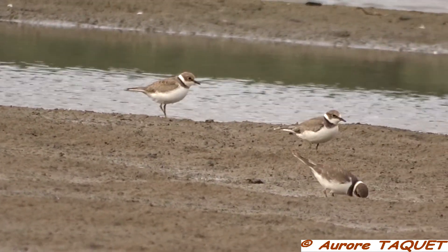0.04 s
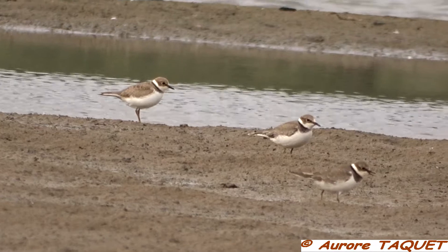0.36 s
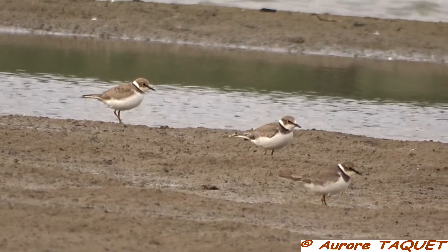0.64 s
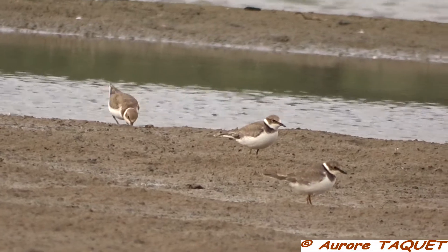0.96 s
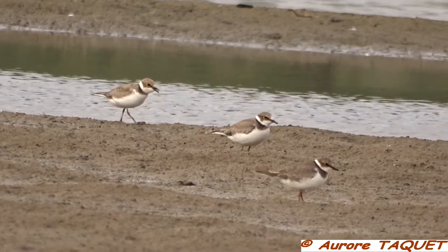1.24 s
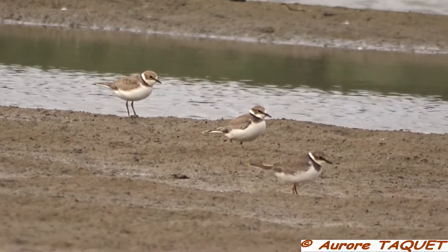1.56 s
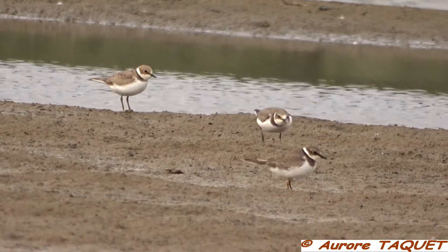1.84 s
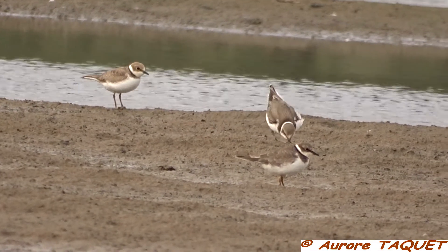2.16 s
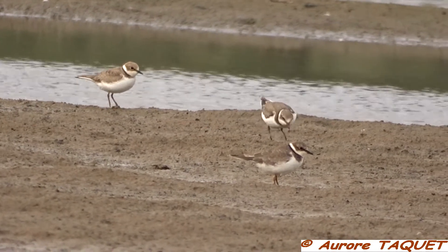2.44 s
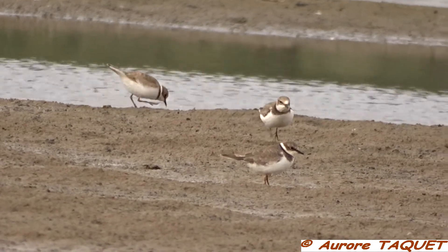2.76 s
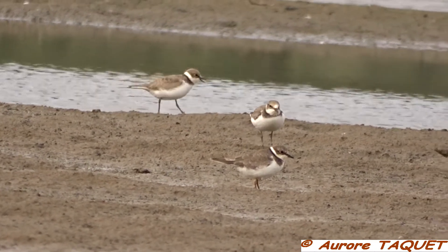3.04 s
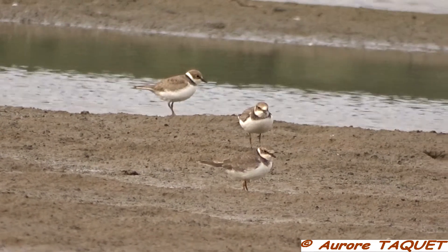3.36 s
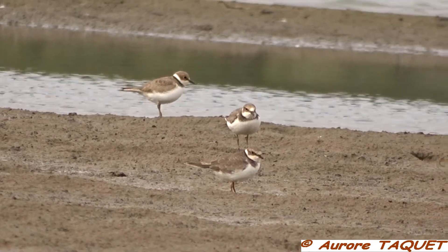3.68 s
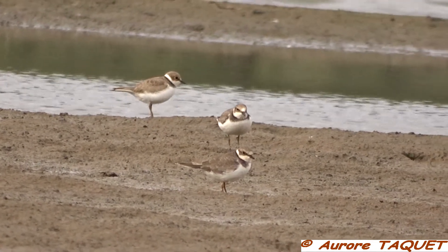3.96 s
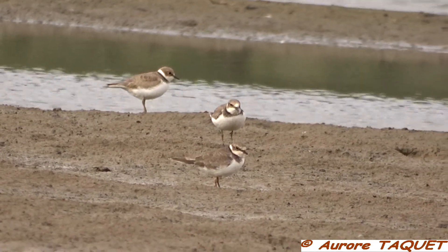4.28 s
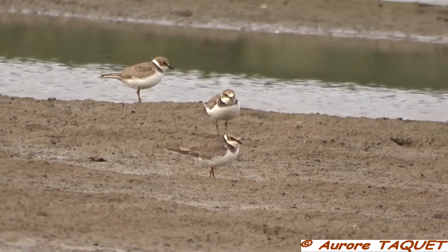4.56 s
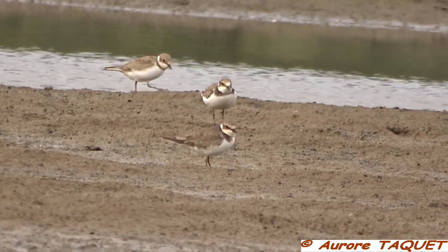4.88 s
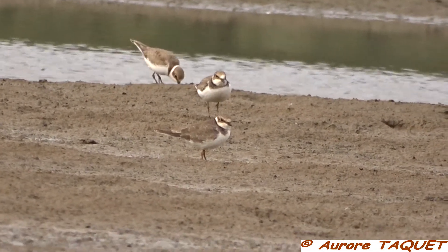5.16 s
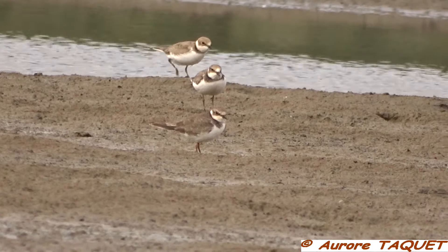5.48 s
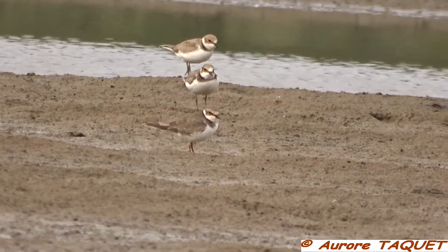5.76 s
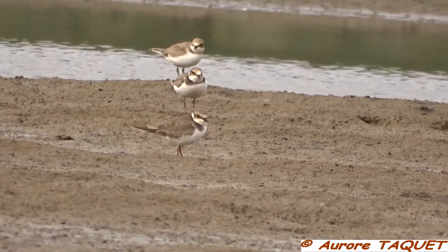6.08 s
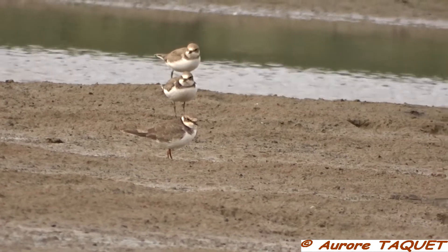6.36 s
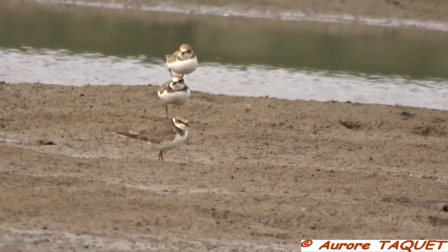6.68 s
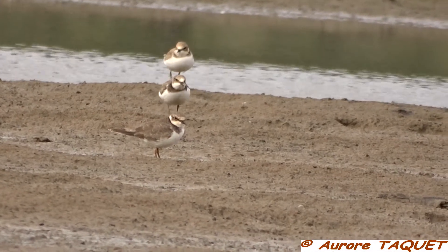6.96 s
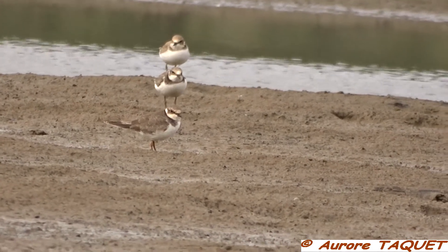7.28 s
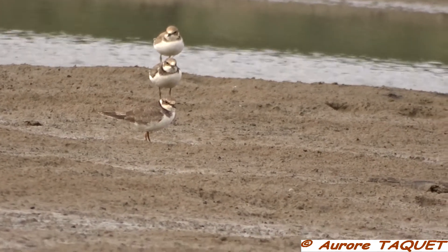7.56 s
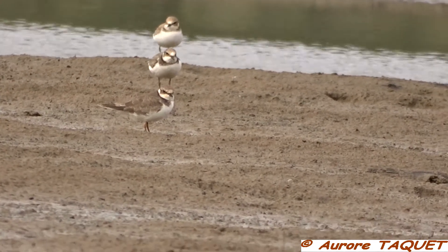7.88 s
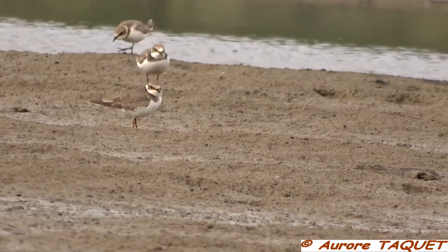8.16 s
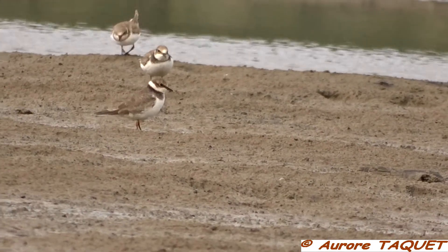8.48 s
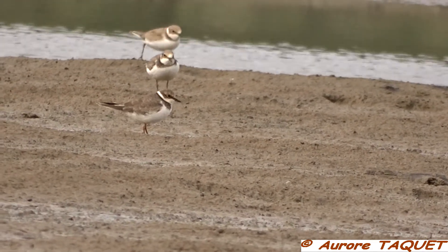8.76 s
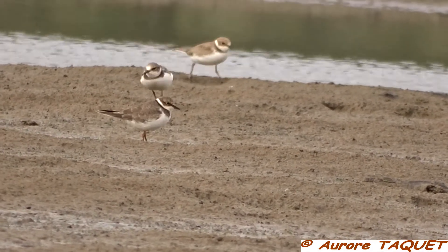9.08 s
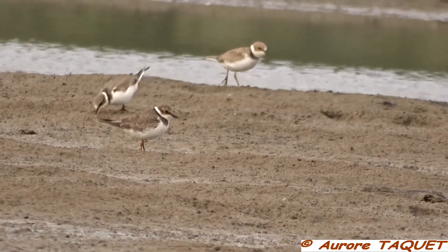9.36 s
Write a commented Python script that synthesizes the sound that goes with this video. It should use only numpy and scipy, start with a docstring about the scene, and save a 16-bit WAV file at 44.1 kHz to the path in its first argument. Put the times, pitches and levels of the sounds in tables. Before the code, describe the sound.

Two brief, high plover calls and faint distant peeps sound as gusts rumble on the microphone and fade to a soft hiss.

```python
"""Gusts buffet a camera microphone on an open sandbank, over a far murmur and a thin hiss.
Near 2 s a small plover gives a short, high call, sung with both sides of its syrinx at once;
the banks scatter it into a short tail. The wind peaks around 3.6 s and dies away after 5 s,
leaving the murmur, the hiss and other birds peeping faintly far off.
The plover calls again near 6.4 s, and the far peeps carry on to the end."""
import sys
import numpy as np
from scipy import signal
from scipy.fft import rfft, irfft, next_fast_len
from scipy.io import wavfile
from scipy.ndimage import map_coordinates

SR = 44100
rng = np.random.default_rng(int(sys.argv[2]) if len(sys.argv) > 2 else 0)


def store_wav(level_fs):
    """Save 16-bit WAV to argv[1]."""
    pcm = np.round(np.clip(np.atleast_2d(level_fs), -1, 1) * 32767)
    wavfile.write(sys.argv[1], SR, pcm.T.astype(np.int16))


N = 420273


def amp(db):
    """Decibels to gain."""
    return 10 ** (np.asarray(db) / 20)


def along(points, hz):
    """Read (Hz, value) points on a log frequency axis."""
    freqs, values = np.transpose(points)
    return np.interp(np.log(hz + 1), np.log(freqs + 1), values)


def curves(rows):
    """Automation lanes: one value per sample for each column after the time."""
    times, *lanes = np.transpose(rows)
    return [np.interp(np.arange(N) / SR, times, lane) for lane in lanes]


def wobble(rate):
    """A smooth random curve, rate knots a second."""
    return map_coordinates(rng.standard_normal(int(N * rate / SR) + 4), [np.arange(N) * rate / SR])


def filtered(x, response):
    """EQ x with a gain given as a function of frequency."""
    size = next_fast_len(N + SR // 2)
    return irfft(rfft(x, size) * response(np.fft.rfftfreq(size, 1 / SR)), size)[..., :N]


def panned(x, left_db):
    """Tilt the balance left_db toward the left."""
    return x * amp([[left_db / 2], [-left_db / 2]])


def rush(spectrum, correlation, lumps_db=0):
    """Stereo noise of rms 1; lumps_db breaks it into bursts before it is coloured."""
    def mid_side_eq(hz):
        width = np.arccos(np.clip(along(correlation, hz), -1, 1)) / 2
        return amp(along(spectrum, hz)) * [np.cos(width), np.sin(width)]
    mid, side = filtered(rng.standard_normal((2, N)) * amp(lumps_db), mid_side_eq)
    stereo = np.array([mid + side, mid - side])
    return stereo / np.sqrt(np.mean(stereo ** 2) + 1e-20)


def scattered(x, t60_s, build_s):
    """The diffuse tail off banks and water, different at each ear."""
    t = np.arange(SR // 2) / SR
    build_up = 1 - np.exp(-(t / build_s) ** 4)
    tail = rng.standard_normal((2, len(t))) * amp(-60 * t / t60_s) * build_up
    return signal.fftconvolve(x[None], tail / np.linalg.norm(tail[0]), axes=1)[:, :N]


def air():
    """The bed: a far murmur of open country and a thin hiss, both easing as the breeze drops."""
    # fader rides, ahead of the trim: time_s, hiss_db, murmur_db
    rides = [(0.0, -55, -59.5), (5.9, -56, -58), (6.9, -57.7, -58.5), (7.5, -58.3, -63),
             (8.15, -58.6, -60.5), (8.5, -59, -63.5), (9.53, -59, -62.5)]
    # tone of each layer: freq_hz, level_db
    murmur_eq = [(20, -4), (45, 4), (80, -11), (125, -4.5), (165, 3.5), (230, -3.5), (390, -15),
                 (480, -7.5), (590, -11), (680, -3.5), (770, -13), (1400, -15.5), (3000, -38), (6000, -66)]
    hiss_eq = [(500, 3.5), (1600, -5.5), (2300, -1), (3000, 1.56), (3600, 1.2), (5800, -0.06), (6400, -2),
               (7100, 2), (7700, 1.5), (8050, 0), (8600, 1), (9400, -2), (10200, -2.5), (11000, -9.5)]
    # left-right likeness: freq_hz, correlation
    image = [(100, 1), (270, 1), (520, .15), (700, 0.34), (1200, 0.17), (2500, 0.59), (5200, 0.82),
             (7600, 0.89), (10000, 0.4)]
    hiss_db, murmur_db = curves(rides)
    murmur = amp(murmur_db + 1.3 * wobble(4)) * rush(murmur_eq, image)
    hiss = amp(hiss_db + 1.46) * rush(hiss_eq, image)
    return panned(murmur, left_db=3.0) + panned(hiss, left_db=-2)


def far_birds(fall_share=0.026):
    """Faint falling peeps, some pure, some raspy, washed in scattered sound."""
    # distant peeps: start_s, length_s, pitch_hz, level_db, rasp_share (of the pitch)
    notes = [(.96, 0.11, 7650, -59, 0.036), (5.50, 0.097, 7100, -59, 0.027), (5.58, 0.092, 7740, -59, .035),
             (5.73, 0.102, 7100, -58, .035), (5.786, .08, 3010, -61.5, .003),
             (6.13, 0.079, 6930, -58, .005), (6.20, 0.065, 6330, -61, .006),
             (6.336, 0.197, 3540, -62, .016), (6.61, .09, 3200, -66, .007), (7.502, 0.096, 5200, -63, .03),
             (9.02, 0.04, 5520, -59.5, .06), (9.13, 0.043, 5800, -55.5, .07), (9.19, 0.036, 5120, -59, .06),
             (9.322, 0.058, 7700, -58, 0.057)]
    t, peeps = np.arange(N) / SR, np.zeros(N)
    jitter = wobble(1200)
    for start, length, hz, db, rasp in notes:
        on = (t > start) & (t < start + length)
        progress = (t[on] - start) / length
        pitch = hz * (1 - fall_share * (progress - .5) + rasp * jitter[on])
        peeps[on] += amp(db) * np.sin(np.pi * progress) * np.sin(2 * np.pi * np.cumsum(pitch) / SR)
    tail = scattered(peeps, t60_s=0.31, build_s=0.01)
    return panned(peeps + amp(-2.5) * tail, left_db=-1.0)


def airflow(attack_s=.016, release_s=0.03, surge_s=0.056, lull_db=-10):
    """Swell, buffet and flutter rides in dB: gusts and surges add to the breeze, lulls cut into it."""
    # the breeze between gusts: time_s, swell_db, buffet_db
    breeze = [(0.0, -40, -42.5), (0.7, -41.5, -40.5), (1.13, -46, -44.5), (1.3, -42, -45.5),
              (1.75, -43, -42.5), (2.65, -43.5, -42), (3.45, -43, -36.5), (3.9, -47, -46.5),
              (4.6, -46, -43), (4.95, -47, -45.5), (5.4, -51, -49), (5.95, -48, -61.5), (6.3, -57.5, -61),
              (7.2, -61, -66), (7.9, -57.5, -71), (8.35, -83, -78), (8.6, -60.5, -75), (9.53, -62.5, -73)]
    # gusts riding on it: start_s, length_s, buffet_db, flutter_db
    gusts = [(0.137, 0.03, -38, -48.5), (0.236, 0.057, -39.5, -41), (0.435, 0.027, -37.5, -41.5),
             (0.521, 0.076, -38.5, -43.5), (1.497, .07, -37.5, -42), (1.652, 0.14, -42.5, -49.5),
             (2.117, 0.084, -33.5, -39.5), (2.246, 0.03, -36.5, -43), (2.319, .1, -37, -46),
             (2.696, 0.013, -39, -43.5), (2.784, 0.082, -35.5, -38), (2.886, .06, -30.5, -34),
             (3.045, 0.059, -39, -40.5), (3.17, 0.12, -34.5, -40), (3.405, 0.24, -38.5, -40.5),
             (3.603, 0.085, -37.5, -33), (3.739, .16, -38.5, -40.5), (4.177, 0.14, -38, -43),
             (4.445, 0.047, -40, -44.5), (4.845, 0.033, -43, -62), (4.979, 0.19, -40, -47.5),
             (5.934, 0.043, -45.5, -64), (7.807, .07, -54, -70)]
    # big slow eddies pressing on both microphone ports: middle_s, level_db
    surges = [(.15, -38), (.82, -40), (1.28, -39), (1.94, -34), (2.335, -33.5), (3.02, -37.5), (3.42, -38),
              (4.11, -35), (4.43, -37.5), (4.935, -37), (5.68, -51)]
    # the air stands almost still: middle_s, length_s
    lulls = [(1.985, 0.035), (4.05, 0.037), (4.378, 0.087), (5.563, 0.092), (5.795, 0.094), (6.215, 0.09)]
    t = np.arange(N) / SR
    bump = lambda middle, length: np.exp(-(2 * (t - middle) / length) ** 2)
    swell_db, breeze_db = curves(breeze)
    buffet = amp(breeze_db)
    fresh_breeze_db, fresh_flutter_db = -42, -54
    flutter = amp(fresh_flutter_db + 1.55 * (breeze_db - fresh_breeze_db))  # grows faster than buffet
    for start, length, buffet_db, flutter_db in gusts:
        end = start + length
        gust = np.interp(t, [start - attack_s, start, end, end + release_s], [0, 1, 1, 0])
        buffet = np.hypot(buffet, amp(buffet_db) * gust)
        flutter = np.hypot(flutter, amp(flutter_db) * gust)
    swell = np.hypot(amp(swell_db), sum(amp(db) * bump(middle, surge_s) for middle, db in surges))
    dips_db = lull_db * sum(bump(middle, length) for middle, length in lulls)
    return 20 * np.log10([swell, buffet, flutter]) + dips_db


def wind():
    """Large eddies swell at both ports alike; faster air sheds small, bright ones."""
    # tone of each layer, darkest first: freq_hz, level_db
    swell_eq = [(10, -8.5), (25, -8.5), (50, -2.5), (80, -4.5), (130, -15), (250, -32), (600, -93)]
    buffet_eq = [(30, -46), (70, -5), (110, 0), (160, 0), (240, -5), (400, -15), (700, -34.5), (1200, -60),
                 (2500, -85)]
    flutter_eq = [(100, -21), (200, -1.5), (310, 2), (550, -6.5), (850, -17.5), (1400, -26), (2200, -44.5),
                  (4000, -62)]
    # left-right likeness: freq_hz, correlation
    wide_image = [(70, 0.95), (140, 0.061), (280, -0.2), (560, -0.55), (1200, -0.5)]
    swell_image = [(30, 1.0), (70, 0.96), (200, 0.6)]
    swell_db, buffet_db, flutter_db = airflow()
    # a light breeze comes in separate puffs, a full gust churns without a break
    puffs = wobble(45) * np.interp(flutter_db, [-52, -38], [1.3, .55])
    swell = amp(swell_db) * rush(swell_eq, swell_image)
    buffet = amp(buffet_db + 1.5 + 1.5 * puffs) * rush(buffet_eq, wide_image, lumps_db=2.3 * wobble(120))
    puff_db = flutter_db + 3.5 * puffs
    # a soft gate: small eddies are shed only once the air is fast enough
    shedding = 1 / (1 + amp(3 * (-56 - puff_db)))
    flutter = shedding * amp(puff_db + 3.0) * rush(flutter_eq, wide_image, lumps_db=4.4 * wobble(220))
    return panned(swell, left_db=-3.5) + panned(buffet, left_db=.5) + panned(flutter, left_db=1.4)


def eddies(thump_hz=420, tick_hz=1600, tick_width_s=0.00039, right_gain=-0.29):
    """Each strong eddy is one push and pull with a tick at its core, driving the ports opposite ways."""
    # hits on the ports, ahead of make-up gain: middle_s, thump_db, tick_db
    hits = [(0.282, -34, -56), (0.566, -44, -70), (1.316, -38, -73), (1.527, -34, -63), (1.761, -33, -75),
            (1.944, -36.5, -72), (2.052, -31.5, -53.5), (2.183, -31, -69), (2.392, -31, -66),
            (2.795, -44, -53), (2.93, -39, -57), (3.091, -38, -61), (3.609, -25, -60), (3.668, -27.5, -65),
            (3.706, -35, -74), (3.812, -28, -56.5), (4.269, -42, -60), (4.288, -36, -59)]
    pops = np.zeros(N + SR)
    t = np.arange(SR // 50) / SR - 1 / 100  # 20 ms centred on the hit
    phase = 2 * np.pi * thump_hz * t
    thump = phase * np.exp(-phase ** 2 / 2)
    tick = np.sin(2 * np.pi * tick_hz * t) * np.exp(-(t / tick_width_s) ** 2 / 2)
    for middle, thump_db, tick_db in hits:
        first = round((middle + t[0]) * SR)
        pops[first:first + len(t)] += amp(thump_db + 9.0) * thump + amp(tick_db + 22.5) * tick
    return pops[:N] * np.array([[1], [right_gain]])


def whistle(start_s, pitch_hz, level_db, attack_s, scoop_hz, hold_s, drop_hz, fade_db_per_s):
    """One side of the syrinx: a wavering tone slides onto its pitch, holds, then drops as it fades."""
    length_s, scoop_s, drop_s, waver_share = .12, 0.0121, 0.0136, .009
    t = np.clip(np.arange(N) / SR - start_s, 0, length_s)
    fading_s = np.maximum(t - hold_s, 0)
    pitch = pitch_hz + scoop_hz * np.exp(-t / scoop_s) - drop_hz * (1 - np.exp(-fading_s / drop_s))
    phase = 2 * np.pi * np.cumsum(pitch * (1 + waver_share * wobble(450))) / SR
    gate = np.minimum(t / attack_s, 1) * (t < length_s)
    return np.sqrt(2) * amp(level_db - fade_db_per_s * fading_s) * gate * np.sin(phase)


def plover():
    """Two voices slide down together; echoes from the banks beat against them and draw them out."""
    # low and high notes of the two calls:
    # start_s, pitch_hz, level_db, attack_s, scoop_hz, hold_s, drop_hz, fade_db_per_s
    notes = [(1.847, 6680, -45, .005, 1, 0.025, 100, 2400), (1.845, 8500, -50, .012, 580, .058, 690, 380),
             (1.891, 6480, -50.5, .008, 100.5, .01, 90, 480),
             (6.381, 7140, -45, 0.011, 90, 0.0272, 340, 300), (6.381, 8600, -54, 0.027, 699, .06, 165, 250)]
    # slaps off the near banks: delay_s, level_db
    banks = [(0.014, -21), (0.038, -7.5), (.07, -6)]
    calls = sum(whistle(*note) for note in notes)
    slaps = lambda hz: sum(amp(db) * np.exp(-2j * np.pi * hz * delay) for delay, db in banks)
    echoes = filtered(calls, slaps)
    tail = scattered(calls, t60_s=0.47, build_s=0.021)
    return panned(calls + echoes + amp(-2.5) * tail, left_db=-5.0)


def scene():
    """The mix: wind on the microphone, the open-air bed and the birds."""
    return wind() + eddies() + air() + plover() + far_birds()


def record(dry):
    """The camera keeps nothing above its band limit."""
    top_hz = 11080
    return filtered(dry, lambda hz: hz < top_hz)


dry = scene()
out = record(dry)
store_wav(out)
```